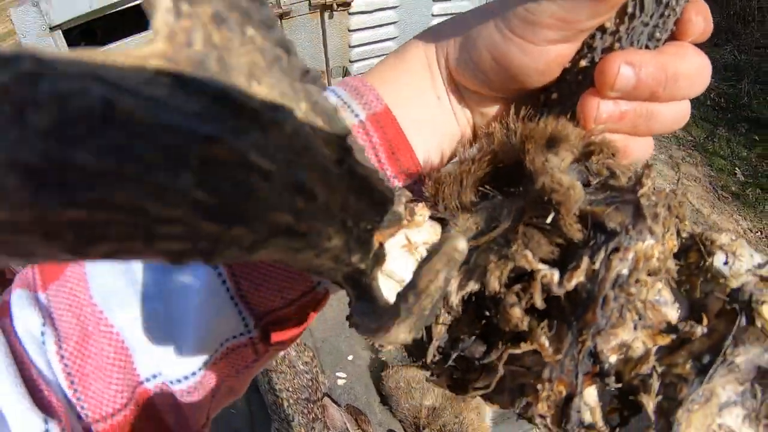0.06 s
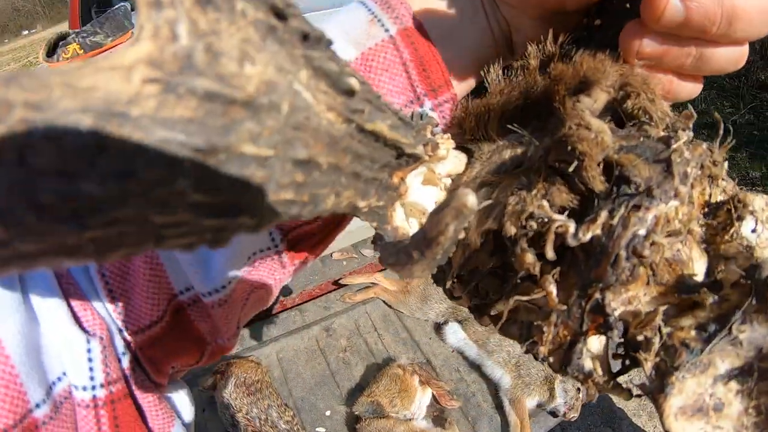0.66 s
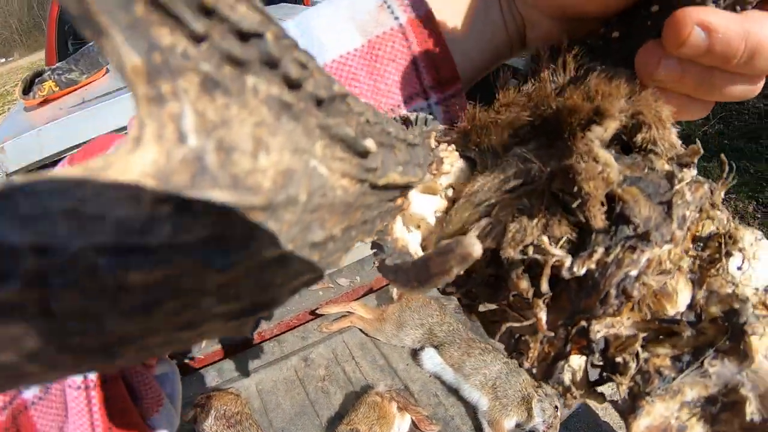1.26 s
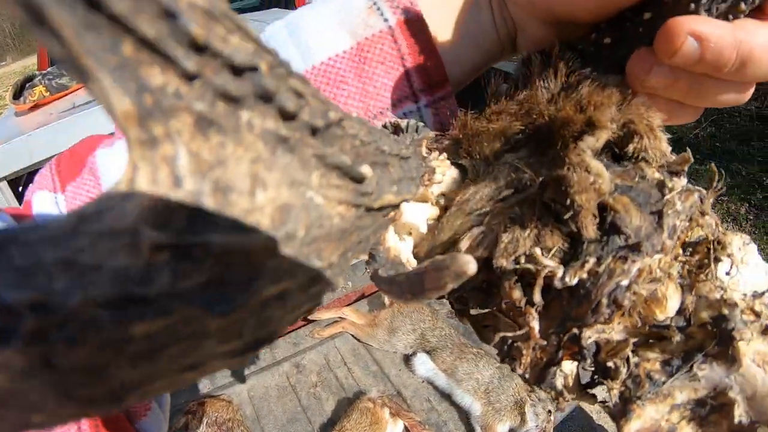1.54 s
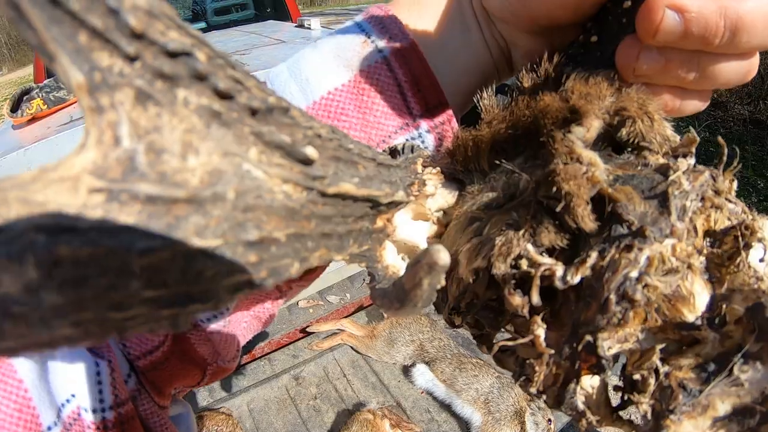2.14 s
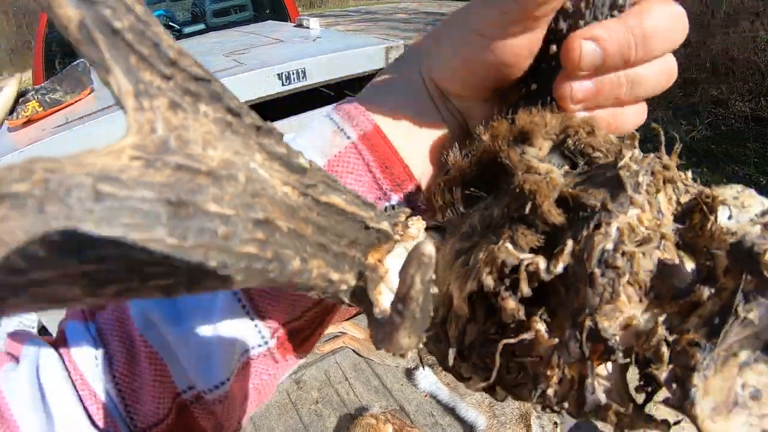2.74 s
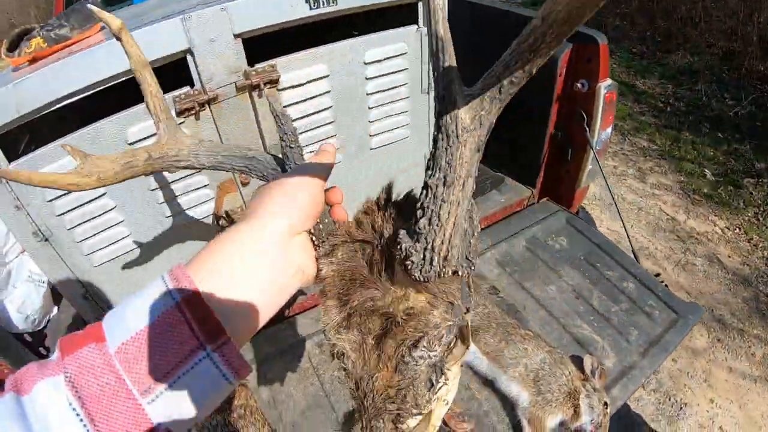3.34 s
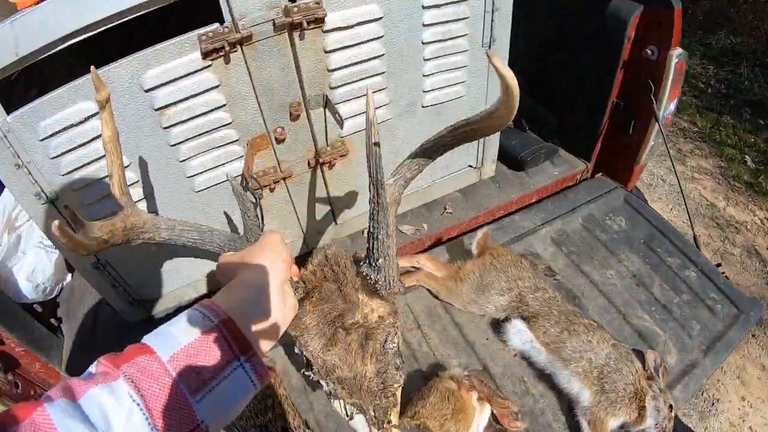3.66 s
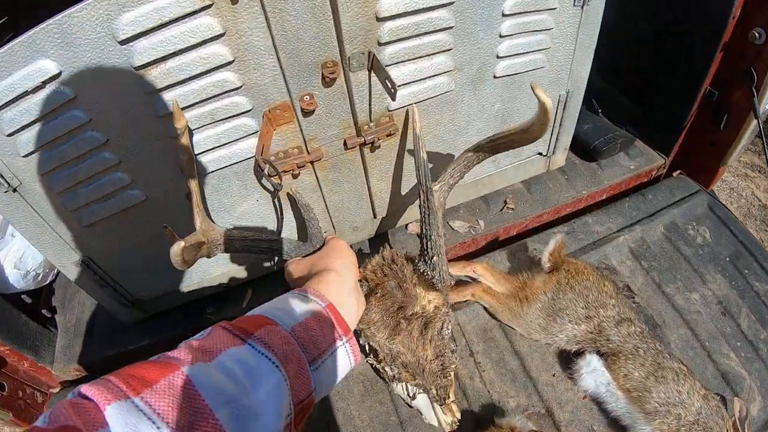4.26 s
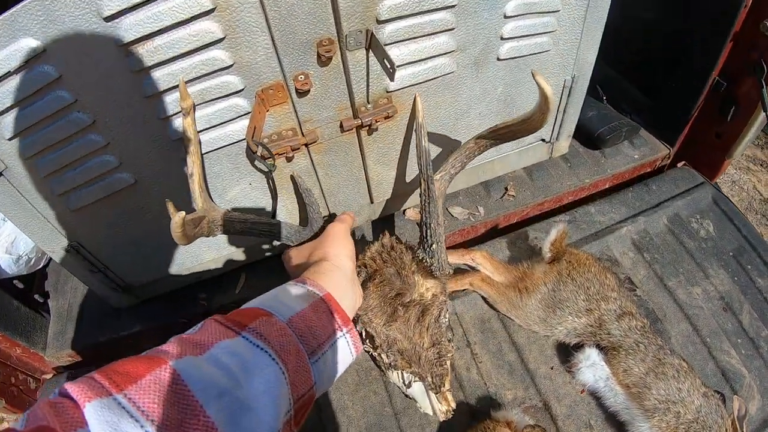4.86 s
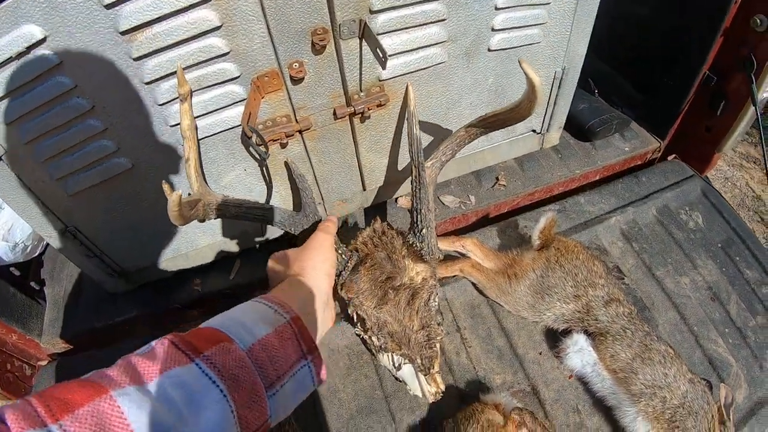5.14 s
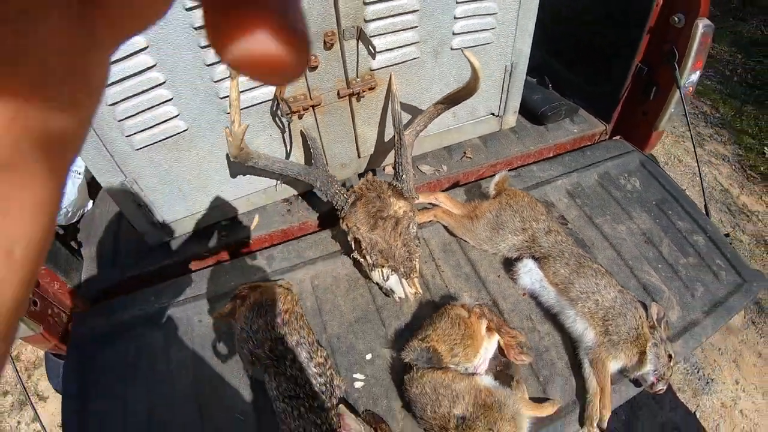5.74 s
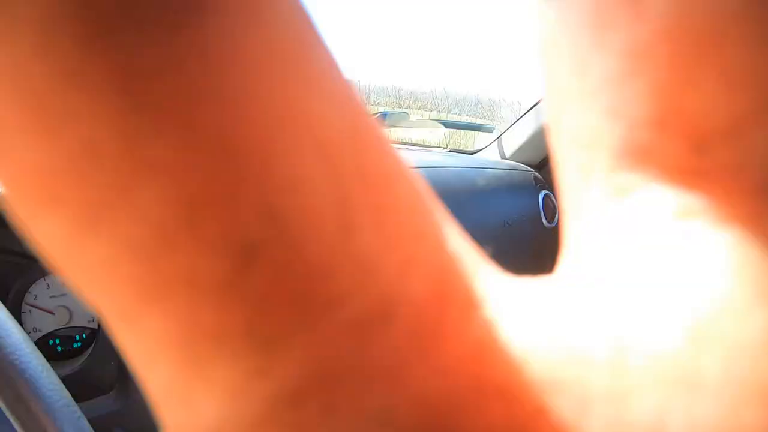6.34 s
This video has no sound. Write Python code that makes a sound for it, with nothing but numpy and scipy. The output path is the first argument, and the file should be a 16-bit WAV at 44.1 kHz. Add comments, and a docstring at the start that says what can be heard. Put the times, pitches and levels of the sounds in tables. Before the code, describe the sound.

A faint low rumble and small chirping birds set a quiet outdoor background. Close by, an antlered skull is handled on a pickup's tailgate, with light taps at about 0.3 and 1.1 seconds. At 2.2 seconds it knocks sharply against a steel toolbox, with two quick, briefly ringing rebounds. Dry bone clicks several times near 3 seconds. From there to about 4 seconds come light taps and a soft sleeve rustle, while one bird repeats a short note. The loudest impact comes between 4.4 and 4.6 seconds: a rapid clatter of antlers on sheet metal, with a low thump from the truck bed. Small taps and faint scuffs follow, then another knock at 5.3 seconds. From 5.8 seconds to the end at about 6.4, fingers slide over the microphone with a close, scratchy hiss, low muffled bumps and a last sharp click.

```python
"""An antlered skull on a tailgate.

The skull is turned in the hand and set down on a pickup's tailgate. Impacts of the antlers excite the
modes of a steel toolbox and the deep modes of the truck bed; dry bone ticks and scuffs, a sleeve
rustles and hide crinkles. Small birds call over a faint outdoor rumble. At the end fingers slide over
the camera's case, making friction noise and pumping air at its two microphone ports."""
import sys
import numpy as np
from scipy import signal
from scipy.fft import rfft, irfft, next_fast_len
from scipy.io import wavfile
from scipy.ndimage import uniform_filter1d, map_coordinates

SR = 44100
rng = np.random.default_rng(int(sys.argv[2]) if len(sys.argv) > 2 else 0)


def int16_out(signal):
    """Quantize to a 16-bit WAV file."""
    q = np.round(np.clip(np.atleast_2d(signal).T, -1, 1) * 32767)
    wavfile.write(sys.argv[1], SR, q.astype(np.int16))


N = 281799

# Contacts of antler and skull. Each row: start in seconds, clatter level in dB, hardness of the edge
# in dB relative to the clatter, weight behind the blow from 0 to 1.
KNOCKS = [(0.259, -46.5, -31, 0.36), (1.084, -36.5, -26, 0.02), (2.182, -20.5, -26, 0.38),
          (2.247, -30, -31, 0.47), (2.315, -28, -29, 0.2), (2.763, -49.5, -35.5, 0.06),
          (3.105, -58.5, -26, 0.2), (3.148, -52, -31.5, 0.12), (3.247, -46, -22.5, 0.06),
          (3.563, -38, -20, 0.18), (3.595, -42, -24.5, 0.31), (3.721, -51.5, -32, 0),
          (4.0, -48.5, -22, 0.38), (4.041, -46.5, -18.5, 0.3), (4.396, -28.5, -18, 0.45),
          (4.411, -28.5, -38.5, 0.51), (4.472, -23, -30.5, 0.96), (4.497, -18.5, -17.5, 0.6),
          (4.505, -17.5, -23.5, 0.54), (4.517, -19, -13, 0.42), (4.529, -24.5, -16.5, 0.45),
          (4.573, -26.5, -21.5, 0.65), (4.729, -57, -30, 1), (4.762, -43, -22.5, 0.1),
          (4.827, -44, -22, 0.08), (4.875, -41, -22.5, 0), (4.953, -47, -33.5, 0.3),
          (5.027, -61.5, -34.5, 0.98), (5.263, -32, -25.5, 0.37), (5.474, -53.5, -23.5, 0.56)]
# Effects of weight. Each row: weight from 0 to 1, bed thump in dB relative to the clatter,
# factor on the ring time, share of deep bass from 0 to 1.
WEIGHT_LAW = [(0, -25.5, 1.49, 0), (0.2, -13, 1.09, 0.05), (0.4, -8, 1.41, 0.56), (0.6, -1.5, 0.8, 0.95),
              (1, 10, 0.31, 0.9)]
BOX_LR_DB = 1.5  # the toolbox stands a little to the left

def knocks():
    """Impact excites box and bed; more weight gives more boom, and bone pressed on damps the ring."""
    out, t = np.zeros((2, N)), np.arange(2 ** 14) / SR
    weights, *effects = np.transpose(WEIGHT_LAW)
    for s, db, edge_db, weight in KNOCKS:
        thump_db, hold, depth = [np.interp(weight, weights, effect) for effect in effects]
        box = amp(-3) * clatter(t, edge_db, depth, hold) + amp(-4) * panel(t, edge_db, depth, hold)
        attack = (1 - np.exp(-t / 0.00031)) * (1 + 0.14 * np.exp(-t / 0.01))
        # only the direct sound tells the side; the ringing comes from all over the box
        add(out, s, amp(db) * attack * box * panned(BOX_LR_DB * np.exp(-t / 0.04)))
        # slow bending waves bring the boom a little later
        add(out, s + 0.003, boom(db + thump_db, depth))
    return out


# Dense ringing of the box. Each row: frequency in Hz, spectral density in dB, nominal T60 in seconds.
CLATTER = [(246, -15, 0.29), (447, -2, 0.31), (760, 1.5, 0.22), (1070, 1.5, 0.11), (1740, -9, 0.21),
           (2400, -4, 0.13), (4540, -12, .13), (6200, -13.5, 0.086), (9660, -21.5, 0.08), (11400, -44, .1),
           (15500, -46.5, .09)]

def clatter(t, edge_db, depth, hold):
    """Overlapping sheet-metal modes merge into noise; harder contact is brighter, treble dies first."""
    hz, db, t60 = np.transpose(CLATTER)
    tilt_db = (edge_db + 22) * along([(250, -1.3), (1200, 0.17), (2500, -0.24), (6500, 1.0)], hz)
    db = db + contact_db(hz, edge_db, depth) + tilt_db
    spectrum = rfft(noise(np.c_[hz, db], size=len(t)))
    grid = np.fft.rfftfreq(len(t), 1 / SR)
    bands = [irfft(spectrum * along(np.c_[hz, band], grid), len(t)) for band in np.eye(len(hz))]
    return sum(band * amp(-60 * t / (life * hold)) for band, life in zip(bands, t60))


# The box's clearest modes. Each row: frequency in Hz, relative level in dB, nominal T60 in seconds.
PANEL_MODES = [(445, -4.5, .17), (509, -3.5, 0.51), (601, 4.5, 0.15), (702, -2, .25), (773, -3.5, 0.11),
               (860, -4.5, 0.14), (960, -9.5, 0.081), (1094, -14, 0.32), (1088, 2, 0.15),
               (1175, -6.5, 0.17), (1314, -8.5, 0.67), (1400, -7.5, .2), (1596, 0, .13), (1750, -15, 0.06),
               (1833, -1, 0.062), (1932, -4.5, 0.11), (2100, -2, 0.099), (2305, -4, 0.21),
               (2445, -3.5, 0.31), (2710, -6, 0.28), (2840, -3, 0.057), (3240, -3.5, 0.14),
               (3420, -7, 0.33)]

def panel(t, edge_db, depth, hold):
    """A struck panel vibrates freely in its normal modes; rust limits how long they ring."""
    longest_t60 = [(1000, 0.26), (2500, 0.2), (3500, 0.14)]
    modes = [(hz, db + contact_db(hz, edge_db, depth), min(t60 * hold, along(longest_t60, hz)))
             for hz, db, t60 in PANEL_MODES]
    return ring(modes, t, scatter_db=3.5, spread=0.47)


def ring(modes, t, scatter_db, spread):
    """Superposition of damped modes, with random strengths and left-right phases at each excitation."""
    hz, db, t60 = np.transpose(modes)[:, :, None]
    strength, skew, phase = rng.standard_normal((3, len(modes), 1))
    gain = amp(db + scatter_db * strength)
    fade = gain / np.sqrt(np.sum(gain ** 2) / 2) * amp(-60 * t / t60)
    angle = 2 * np.pi * (hz * t + phase)
    return np.array([np.sum(fade * np.sin(angle + side * spread * skew), 0) for side in (1, -1)])


def contact_db(hz, edge_db, depth, boost_db=7):
    """Contact time shapes the spectrum: a harder, briefer blow favours a higher band."""
    favoured_hz = np.interp(edge_db, [-45.5, -26.5, -23.5, -8.0], [850, 1050, 2260, 3300])
    peak = np.exp(-(np.log2(hz / favoured_hz) / 0.68) ** 2)
    return lightness_db(hz, depth) + boost_db * (peak - 0.4)


def lightness_db(hz, depth):
    """Striking mass sets the bass: a tine's tap has less deep bass than a blow of the whole skull."""
    tap_db = along([(90, -37.5), (160, 17.5), (300, -1.5), (550, -14), (850, 2)], hz)
    return (1 - np.clip(depth, 0, 1)) * tap_db


# Modes of the truck bed. Each row: frequency in Hz, relative level in dB, T60 in seconds.
BED_MODES = [(68.7, -9, 0.84), (79.2, 9.5, .25), (90, -2, 0.27), (107.6, 4, 0.49), (151.2, -8.5, 0.65),
             (183.1, 1, 0.27), (203, 0.5, 0.25), (228, -4, 0.38), (281.6, -12.5, 0.27),
             (361.5, -19.5, 0.74)]

def boom(thump_db, depth):
    """The impulse response of a large plate: a few deep modes in a noisy shudder."""
    t = np.arange(2 ** 15) / SR
    hz, db, t60 = np.transpose(BED_MODES)[:, :, None]
    db = db + lightness_db(hz, depth)
    modes = np.sum(amp(db - 60 * t / t60) * np.sin(2 * np.pi * hz * t), 0)
    modes /= np.sqrt(np.sum(amp(db) ** 2) / 2)
    colour = [(45, -41), (80, -1.5), (130, 4), (240, -6.5), (330, -5), (550, -24), (1200, -67.5)]
    shudder = noise(colour, size=len(t)) * amp(-60 * t / 0.43)
    push = amp(thump_db) * (amp(1) * modes + amp(-8) * shudder) * (1 - np.exp(-t / 0.0016))
    # the open bed radiates little below its lowest mode
    return signal.sosfilt(signal.butter(4, 55, "highpass", fs=SR, output="sos"), push)


# Snaps of bone and antler. Each row: start in seconds, relative level in dB, resonance in Hz.
TICKS = [(0.37, -54, 2500), (0.495, -52.5, 3440), (2.182, -19, 1280), (2.909, -38.5, 3420),
         (2.915, -46, 3680), (2.92, -34, 3650), (2.959, -37.5, 5200), (2.965, -36.5, 2670),
         (2.9837, -30.5, 1480), (3.007, -45.5, 2410), (3.249, -50, 3020), (4.041, -38.5, 2730),
         (4.507, -20, 1460)]
SNAP_CYCLES, SNAP_LR_DB = 20, 1  # the resonance falls 60 dB in this many cycles

def ticks():
    """Dry bone snaps as a heavily damped oscillator inside a tiny broadband crack."""
    out, t = np.zeros((2, N)), np.arange(SR // 20) / SR
    colour = [(500, -15.5), (1300, 0.5), (4000, 4.5), (7000, -7.5), (9500, -6),
              (11500, -24), (15500, -22)]
    for s, db, hz in TICKS:
        crack = noise(colour, [(4000, 0.99), (8000, 0.12)], size=len(t)) * amp(-60 * t / 0.0093)
        tone = np.sin(2 * np.pi * hz * t) * amp(-60 * t * hz / SNAP_CYCLES)
        snap = (tone + 0.6 * crack) * (1 - np.exp(-t / 0.00086))
        add(out, s, amp(db + 4) * snap * panned(SNAP_LR_DB))
    return out


# Bone rubbing on the box. Each row: centre in seconds, length in seconds, relative level in dB.
SCUFFS = [(0.253, 0.23, -63.5), (0.735, 0.041, -58.5), (0.823, 0.057, -62), (1.69, 0.1, -64),
          (2.061, 0.061, -61.5), (2.171, 0.043, -40), (3.226, 0.07, -54.5), (3.933, 0.13, -56),
          (4.967, 0.081, -54.5), (5.503, 0.048, -45.5)]

def scuffs():
    """Sliding friction makes uneven noise, which drives the panel modes in forced vibration."""
    contact = swells(SCUFFS) * unit(amp(4.4 * wobble(220)))
    rub = contact * noise([(200, -7), (500, -3.5), (750, 4.5), (1400, 4), (2600, -3),
                           (4500, -12.5), (9000, -23), (12000, -46)])
    response = ring(PANEL_MODES, np.arange(SR // 4) / SR, scatter_db=2.5, spread=0.88)
    ringing = signal.fftconvolve(rub, response / np.linalg.norm(response[0]), axes=1)[:, :N]
    return amp(-4.5) * rub + amp(-14) * ringing


# Finger strokes on the case. Each row: start in seconds, time to full speed in seconds,
# length in seconds, peak friction in dB, left minus right in dB.
STROKES = [(5.825, 0.073, 0.3, -31, 3.5), (6.128, 0.021, 0.032, -30, 1.5),
           (6.213, 0.0062, 0.039, -42.5, -0.5), (6.247, 0.013, 0.045, -51.5, 5),
           (6.3, 0.0047, 0.046, -39, 0)]
# Squeezes of the case. Each row: centre in seconds, length in seconds, level in dB.
SQUEEZES = [(5.886, 0.016, -20), (6.163, 0.037, -27.5), (6.37, 0.0094, -24.5)]
LIFT_S, PORT_LAG_S = 0.0027, 0.00029  # the hiss dies as a finger lifts; it reaches the right port later
GRIP_S, RELEASE_S, GRIP_DB, TIGHTEN_DB_PER_S = 5.87, 6.38, -44.5, 23.5  # the hand closes over the ports

def fingers():
    """Skin friction hisses on the case, while the tightening hand displaces air at the ports."""
    t = np.arange(N) / SR
    friction = sum(amp(db) * stroke(s, rise, length) * panned(lr_db)
                   for s, rise, length, db, lr_db in STROKES)
    grip = (t > GRIP_S) * (t < RELEASE_S) * amp(GRIP_DB + TIGHTEN_DB_PER_S * np.maximum(t - GRIP_S, 0))
    grip = uniform_filter1d(grip, size=256)
    left, right = cavity()
    skin = np.array([left, np.roll(right, round(PORT_LAG_S * SR))])
    hiss = (friction + amp(-20) * grip) * amp(1.1 * wobble(500)) * skin
    air = noise([(15, 0.5), (28, 0), (60, -10.5), (120, -14), (250, -25.5), (600, -38), (2000, -84.5)],
                coherence=[(30, 0.093), (200, 0.23)])
    return hiss + (grip + swells(SQUEEZES)) * air


def stroke(s, rise, length):
    """Friction gain follows speed: the finger accelerates, slows and lifts off."""
    t = np.maximum(np.arange(N) / SR - s, 0)
    return t / rise * np.exp(1 - t / rise - np.maximum(t - length, 0) / LIFT_S)


# Hiss of sliding skin. Each row: frequency in Hz, spectral density in dB.
SKIN = [(250, -11), (500, -18), (800, -11.5), (1080, -19), (1400, 2), (2000, 1.5), (2600, -4), (3400, -3.5),
        (4500, -6.5), (7400, -7), (9400, -4), (11000, -25), (14000, -27), (15600, -36)]

def cavity():
    """Cavity resonance under the finger colours the hiss, sinking as the gap lengthens, then leaping."""
    hz, s, spectra = signal.stft(noise(SKIN, [(1200, 0.4), (2500, 0.32), (9000, 0.17)]), SR, nperseg=256)
    centre_hz = np.interp(s, [5.85, 5.92, 6.0, 6.1, 6.14], [9300, 7600, 6200, 5450, 10700])
    peak_db = 5 * np.exp(-((hz[:, None] - centre_hz) / 900) ** 2)
    return unit(signal.istft(spectra * amp(peak_db), SR, nperseg=256)[1][:, :N])


# Finger bumps. Each row: centre in seconds, length in seconds, resonance in Hz, level in dB.
BUMPS = [(5.854, 0.0227, 1602, -31.5), (5.882, 0.014, 1440, -27.5), (5.929, 0.0047, 1585, -29.5),
         (6.155, 0.0228, 1467, -33), (6.305, 0.0086, 1507, -31), (6.3771, 0.0013, 843, -10.5)]

def case_flex():
    """Flexure of the shell pushes the two ports in opposite senses, so their coherence is negative."""
    out = np.zeros((2, N))
    for s, length, hz, db in BUMPS:
        colour = [(hz / 4, -40), (hz * 0.64, -16), (hz, 0), (hz * 1.1, -13),
                  (hz * 7, -30), (hz * 20, -60)]
        out += amp(db) * swell(s, length) * noise(colour, [(1000, -0.87), (1450, -0.34)])
    return out


# Arm movements. Each row: time of full speed in seconds, hold in seconds, level in dB.
ARM_MOVES = [(0, 0.41, -76), (3.19, 0.19, -60), (3.758, 0.37, -59.5), (4.702, 0.99, -71.5)]
# Rustle of cloth. Each row: frequency in Hz, spectral density in dB.
CLOTH = [(300, -36.5), (600, -22), (1100, -3.5), (1900, 6), (2900, -1), (4500, -14.5), (7500, -20.5),
         (9500, -24.5), (11500, -56.5), (15500, -49.5)]
ARM_RISE_DB_PER_S, ARM_FALL_DB_PER_S = 92, 36

def sleeve():
    """Friction noise of cloth builds up, holds and dies away with each swing of the arm."""
    motion = np.zeros(N)
    for s, length, db in ARM_MOVES:
        t = np.arange(N) / SR - s
        fade_db = ARM_RISE_DB_PER_S * np.minimum(t, 0) - ARM_FALL_DB_PER_S * np.maximum(t - length, 0)
        motion += amp(db + fade_db)
    flutter = amp(1.5 * wobble(25) + 2.3 * wobble(400))
    return motion * flutter * noise(CLOTH, [(1000, 0.18), (6000, 0.46)])


# Crinkles of hide and fur. Each row: centre in seconds, length in seconds, level in dB.
CRINKLES = [(0.13, 0.48, -71.5), (3.357, 0.032, -64), (5.078, 0.021, -64.5), (5.353, 0.023, -64.5)]
# Their spectrum. Each row: frequency in Hz, spectral density in dB.
HIDE = [(800, -20), (2000, 3), (4000, 0.5), (8000, -0.5), (10000, -9.5), (11500, -26), (15500, -23)]

def hide():
    """Dry hide deforms under the hand, giving grainy puffs of amplitude-modulated treble noise."""
    grain = unit(amp(3.3 * wobble(350)))
    return swells(CRINKLES) * grain * noise(HIDE, [(2000, 0.76), (8000, 0.16)])


# Calls of four birds. Each row: start in seconds, relative level in dB.
HIGH_CALLS = [(0.747, -50.5), (2.127, -46.5), (3.886, -47.5)]
SLUR_CALLS = [(0.0, -71), (1.806, -72), (3.78, -72)]
MID_CALLS = [(2.643, -70), (2.969, -52.5), (3.294, -50), (3.603, -49), (3.903, -51)]
LOW_CALLS = [(2.51, -72.5), (2.82, -68.5), (3.45, -64)]

def birds():
    """Each bird repeats one note; all but the mid-pitched one sit deep in the branches, where echo dominates."""
    return (bird(HIGH_CALLS, 0.04, first_hz=6050, goal_hz=8300, bend=4.5, droop_hz=650, echo_db=6)
            + bird(SLUR_CALLS, 0.04, first_hz=7250, goal_hz=6750, bend=3, droop_hz=0, echo_db=6)
            + bird(MID_CALLS, 0.042, first_hz=2950, goal_hz=3380, bend=1.3, droop_hz=0, echo_db=-2.5)
            + bird(LOW_CALLS, 0.11, first_hz=1540, goal_hz=2200, bend=2, droop_hz=340, echo_db=6))


def bird(calls, length_s, first_hz, goal_hz, bend, droop_hz, echo_db):
    """A frequency-modulated whistle glides and levels off; scattering by trees makes it reverberate."""
    out, t = np.zeros((2, N)), np.arange(SR // 2) / SR
    u = np.linspace(0, 1, int(length_s * SR))
    hz = first_hz + (goal_hz - first_hz) * np.expm1(-bend * u) / np.expm1(-bend) - droop_hz * u ** 2
    hz *= 1 + 0.00079 * bend * np.sin(2 * np.pi * 130 * length_s * u)
    envelope = np.minimum(1, u * bend / 0.51) * np.sqrt(1 - u)
    note = envelope * np.sin(2 * np.pi * np.cumsum(hz) / SR)
    for s, db in calls:
        trees = rng.standard_normal((2, len(t))) * (amp(-60 * t / 0.17) + 0.23 * amp(-60 * t / 0.56))
        echo = signal.fftconvolve(note[None], trees / np.linalg.norm(trees[0]), axes=1)
        add(out, s, amp(db + 1) * note)
        add(out, s, amp(db + echo_db) * echo)
    return out


# Slow drift of the rumble. Each row: time in seconds, level in dB.
RUMBLE_LEVELS = [(0.4, -57), (1.6, -61.5), (3.8, -57.5), (5.5, -58.5)]
# Spectra of the background. Each row: frequency in Hz, spectral density in dB.
RUMBLE = [(20, -26), (40, -15.5), (75, -15.5), (105, -26), (145, 2.5), (205, -1), (290, -8.5), (420, -17),
          (600, -41), (1100, -90.5)]
HISS = [(200, -29.5), (450, -10.5), (750, -0.5), (1100, -7.5), (2000, -16), (4500, -21.5), (9000, -24.5),
        (11000, -38.5), (15500, -57)]

def outdoors():
    """Ambient noise: a distant rumble, a wavering drone that swells once, and a faint, even hiss."""
    rumble_db = np.interp(np.arange(N) / SR, *np.transpose(RUMBLE_LEVELS))
    rumble = amp(rumble_db + 1.2 * wobble(6.3)) * noise(RUMBLE)
    drone_gain = amp(-53 + 1.8 * wobble(16)) * swell(3.98, 0.41)
    drone_hz = 171 + 4 * wobble(8.3)
    drone = drone_gain * unit(np.sin(2 * np.pi * np.cumsum(drone_hz) / SR))
    hiss = amp(-68.5 + 0.6 * wobble(1.7)) * noise(HISS, [(500, 0.12), (1500, 0.14), (6000, 0.11)])
    return rumble + drone + hiss


# Likeness of the two channels. Each row: frequency in Hz, left-right correlation.
COHERENCE = [(30, 0.31), (80, .98), (300, 0.59), (800, 0.75), (2500, .78), (5000, 0.83), (9000, 0.099)]

def noise(spectrum, coherence=COHERENCE, size=N):
    """Stereo noise of rms 1, coloured by (Hz, dB) points; the mid-side balance sets its coherence."""
    m = next_fast_len(size)
    hz = np.fft.rfftfreq(m, 1 / SR)
    turn = np.arccos(np.clip(along(coherence, hz), -1, 1)) / 2
    coloured = rfft(rng.standard_normal((2, m))) * amp(along(spectrum, hz))
    mid, side = irfft(coloured * [np.cos(turn), np.sin(turn)], m)[:, :size]
    return unit(np.array([mid + side, mid - side]))


def amp(db):
    """Decibels to gain."""
    return 10 ** (np.asarray(db) / 20)


def unit(x):
    """Scale to rms 1."""
    return x / np.sqrt(np.mean(x ** 2) + 1e-20)


def along(points, hz):
    """Interpolate (Hz, value) points on a log axis."""
    f, v = np.transpose(points)
    return np.interp(np.log(hz + 1), np.log(f + 1), v)


def wobble(rate):
    """A smooth random curve, rate knots a second."""
    return map_coordinates(rng.standard_normal(int(N * rate / SR) + 4), [np.arange(N) * rate / SR])


def swell(s, length):
    """A Gaussian envelope centred on s."""
    return np.exp(-2 * ((np.arange(N) / SR - s) / length) ** 2)


def swells(rows):
    """A sum of Gaussian envelopes."""
    return sum(amp(db) * swell(s, length) for s, length, db in rows)


def panned(lr_db):
    """Left and right gains from a level difference."""
    return amp(np.array([lr_db, -lr_db]).reshape(2, -1) / 2)


def add(track, s, sound):
    """Mix a sound into the track from time s."""
    i = round(s * SR)
    sound = sound[..., max(-i, 0):N - i]
    track[..., max(i, 0):max(i, 0) + sound.shape[-1]] += sound


def scene():
    """Superposition of all sources at the two ports."""
    return (knocks() + ticks() + birds() + sleeve() + scuffs() + hide()
            + fingers() + case_flex() + outdoors())


TOP_HZ = 15700

def record(dry):
    """An ideal low-pass filter removes everything above the band limit."""
    m = next_fast_len(N + SR // 2)
    return irfft(rfft(dry, m) * (np.fft.rfftfreq(m, 1 / SR) < TOP_HZ), m)[:, :N]


dry = scene()
out = record(dry)
int16_out(out)
```